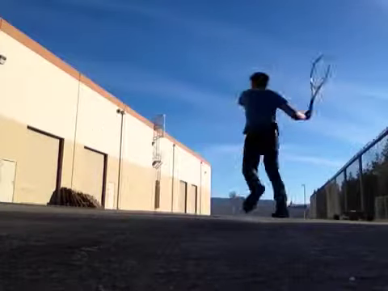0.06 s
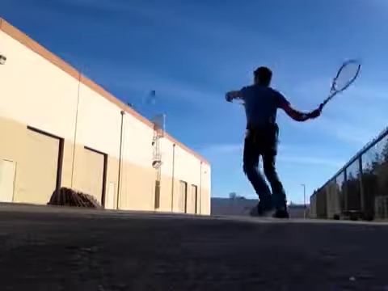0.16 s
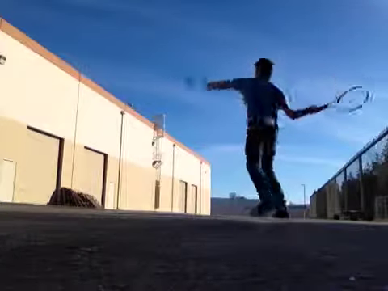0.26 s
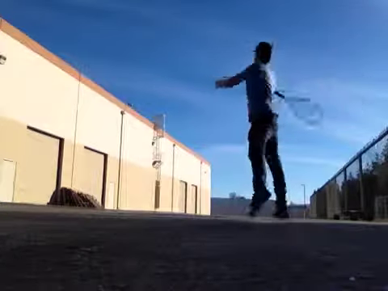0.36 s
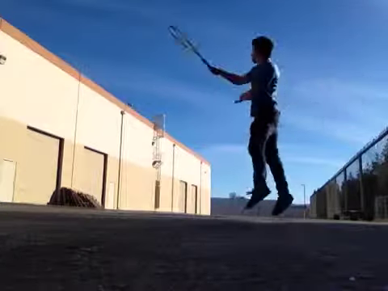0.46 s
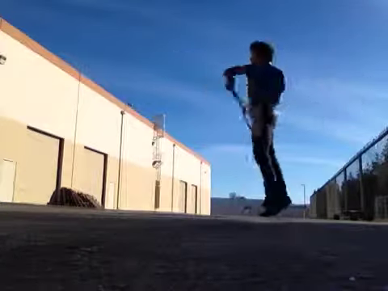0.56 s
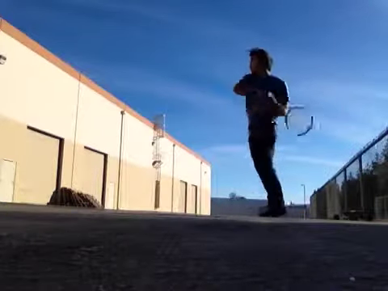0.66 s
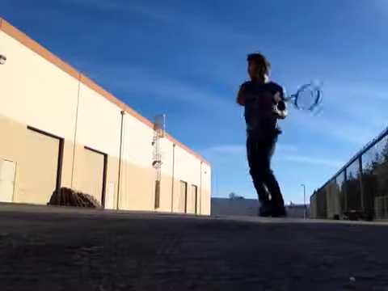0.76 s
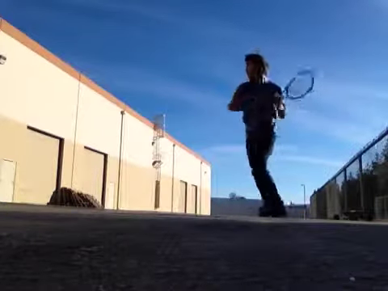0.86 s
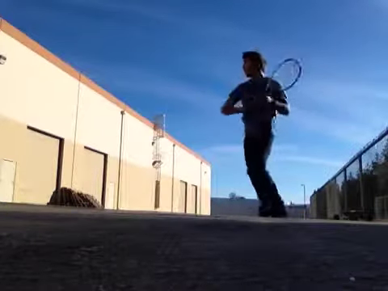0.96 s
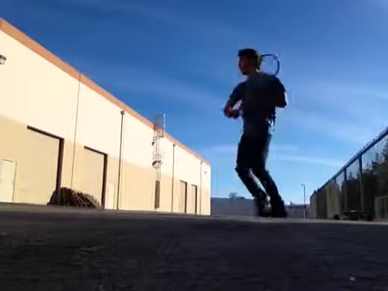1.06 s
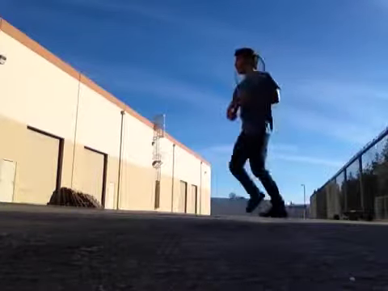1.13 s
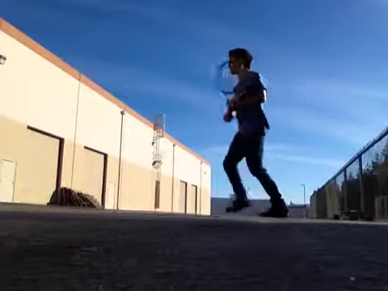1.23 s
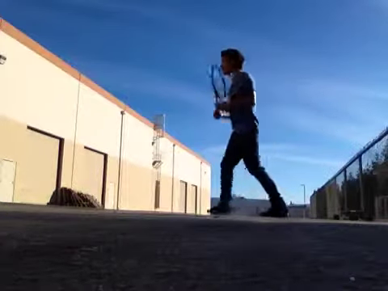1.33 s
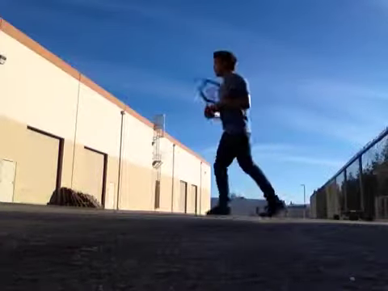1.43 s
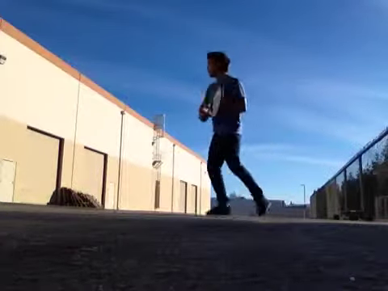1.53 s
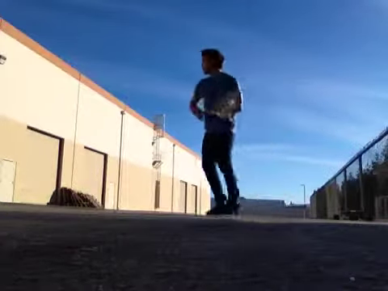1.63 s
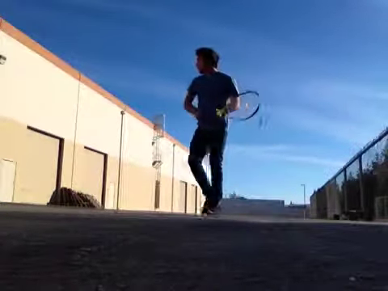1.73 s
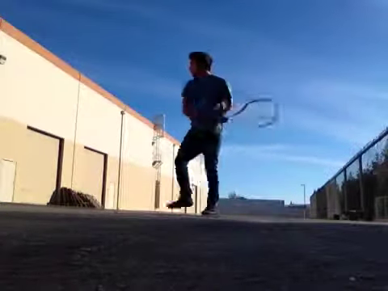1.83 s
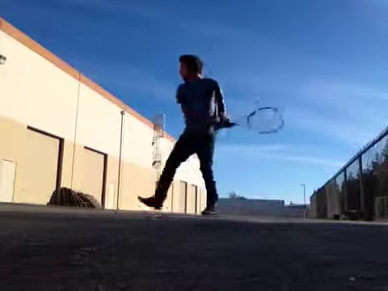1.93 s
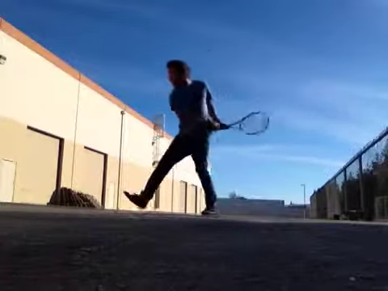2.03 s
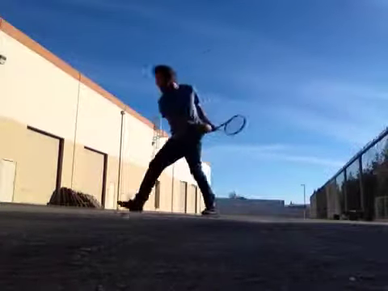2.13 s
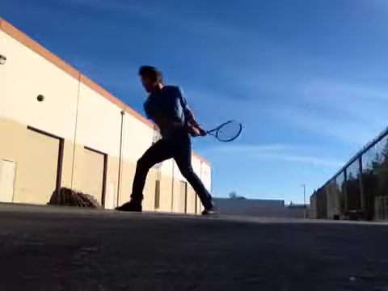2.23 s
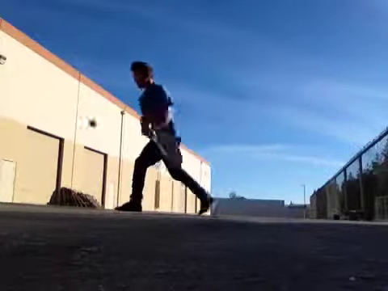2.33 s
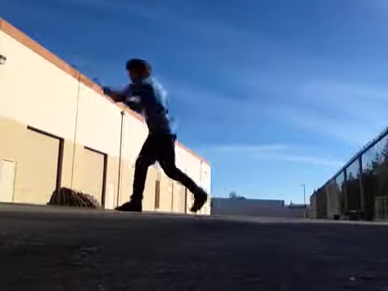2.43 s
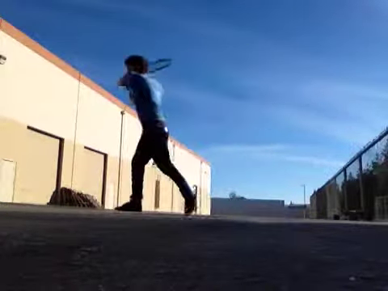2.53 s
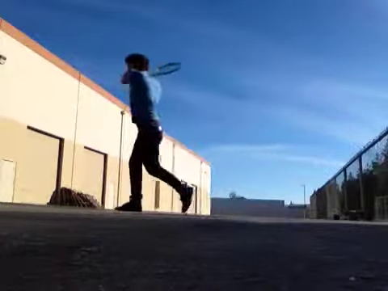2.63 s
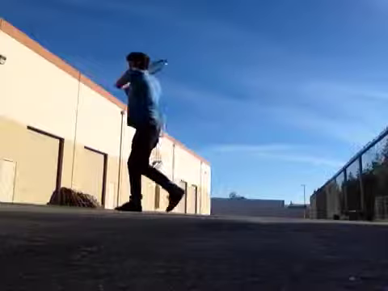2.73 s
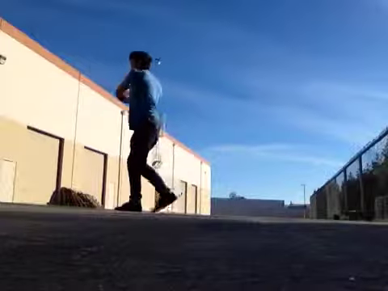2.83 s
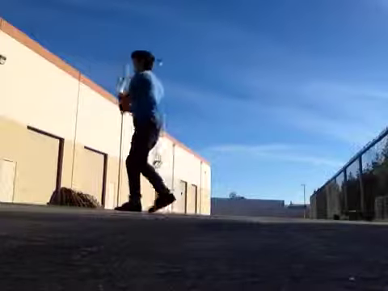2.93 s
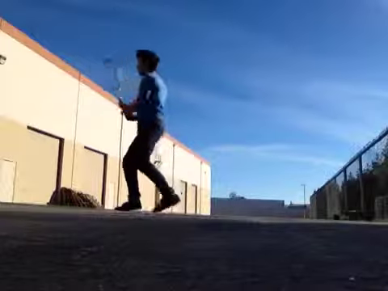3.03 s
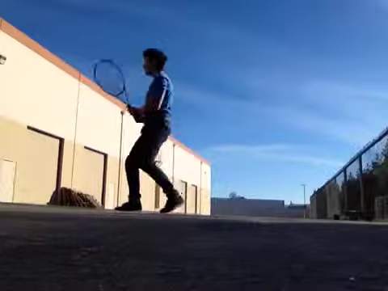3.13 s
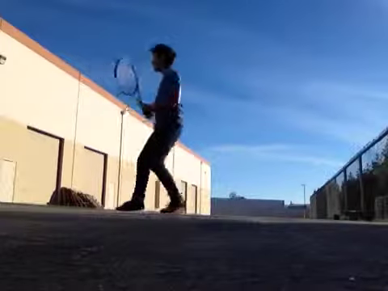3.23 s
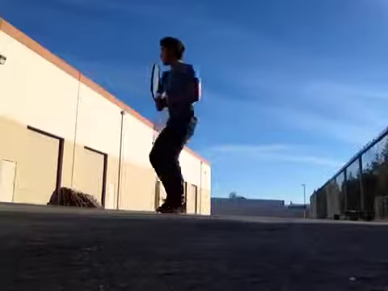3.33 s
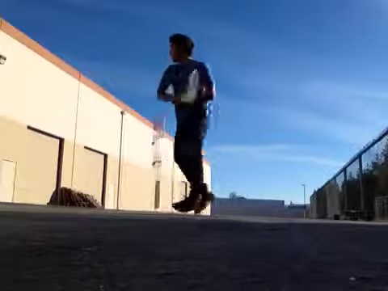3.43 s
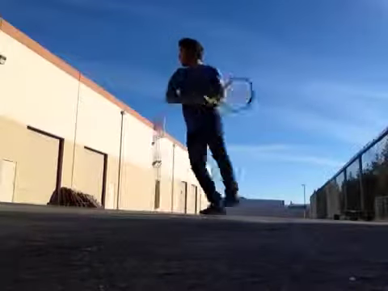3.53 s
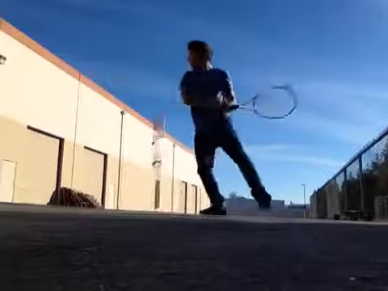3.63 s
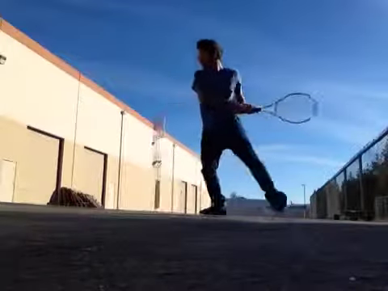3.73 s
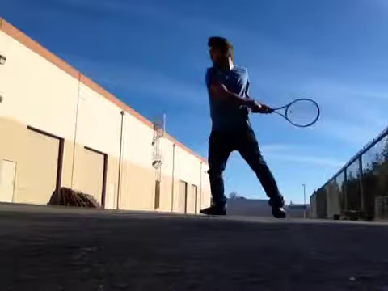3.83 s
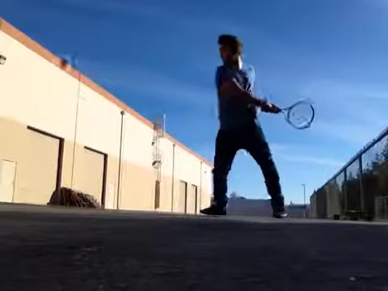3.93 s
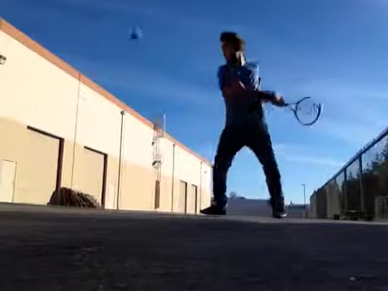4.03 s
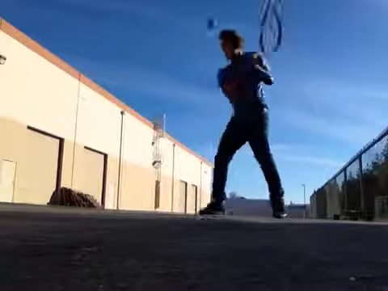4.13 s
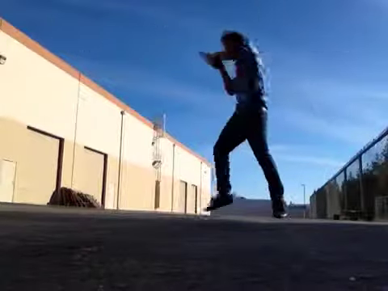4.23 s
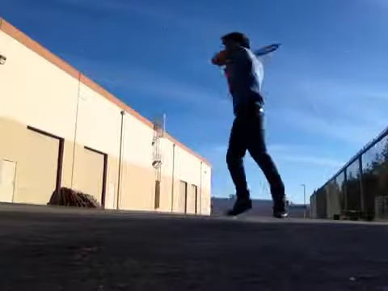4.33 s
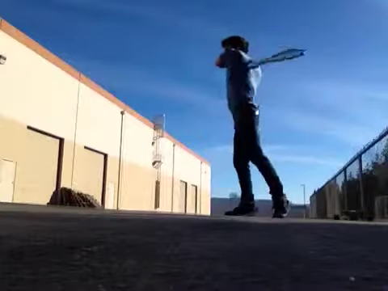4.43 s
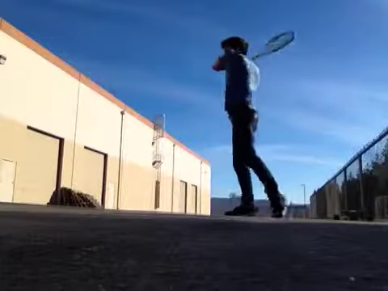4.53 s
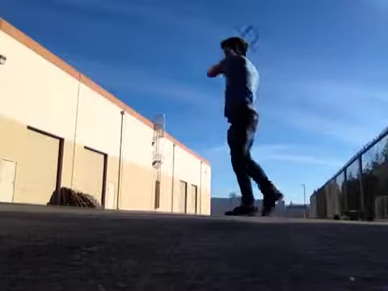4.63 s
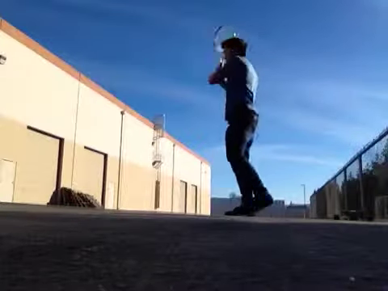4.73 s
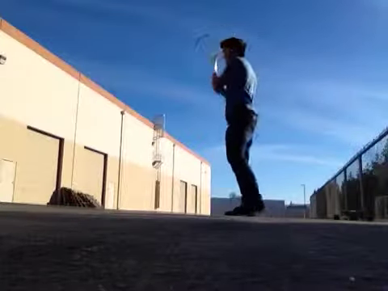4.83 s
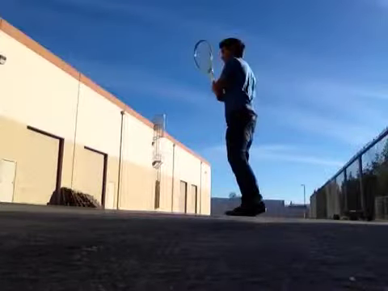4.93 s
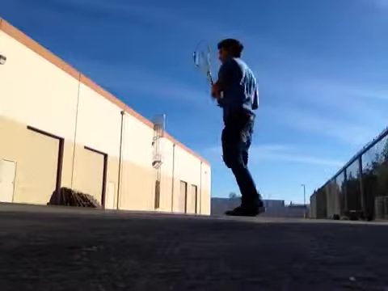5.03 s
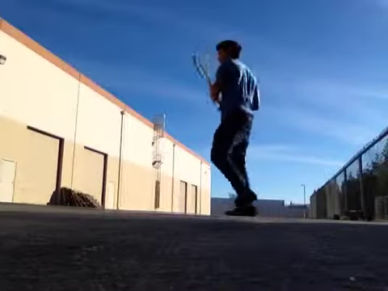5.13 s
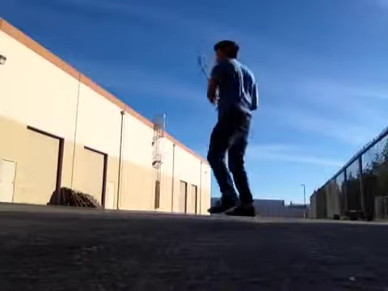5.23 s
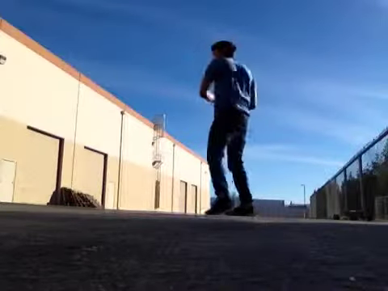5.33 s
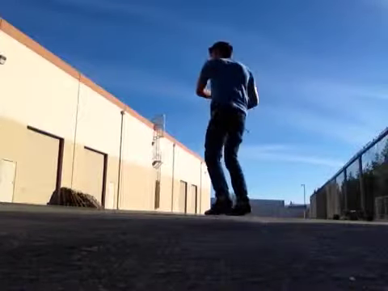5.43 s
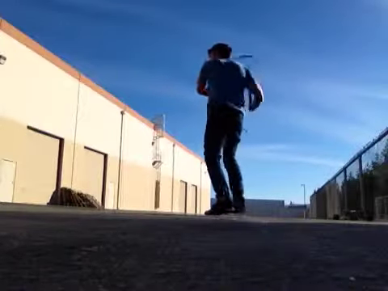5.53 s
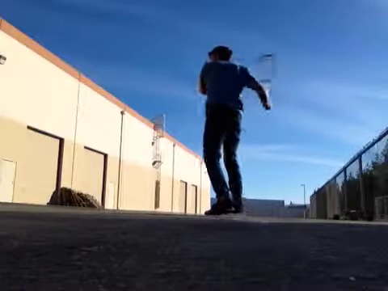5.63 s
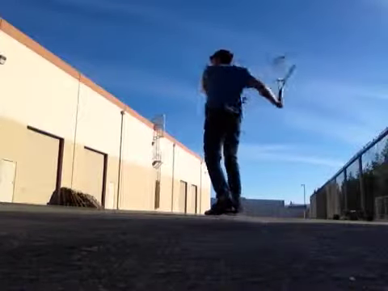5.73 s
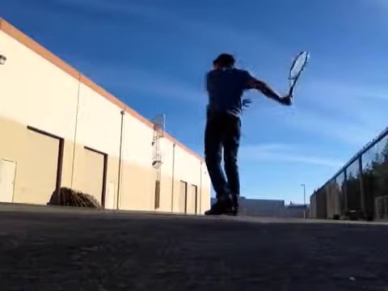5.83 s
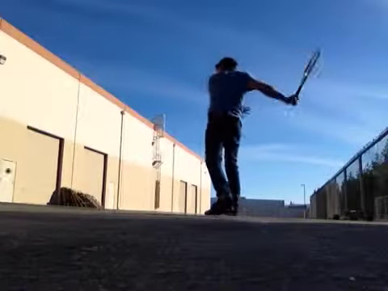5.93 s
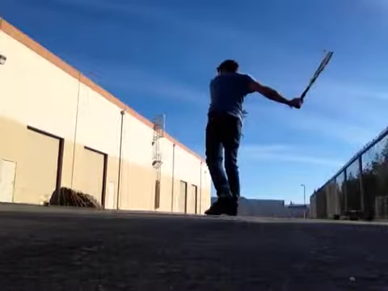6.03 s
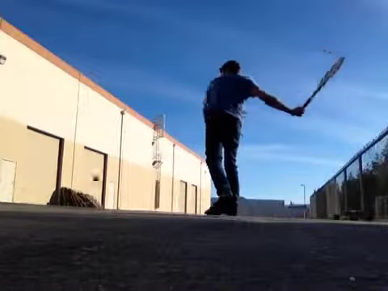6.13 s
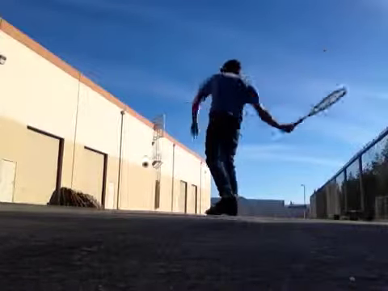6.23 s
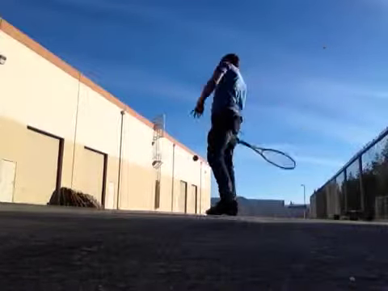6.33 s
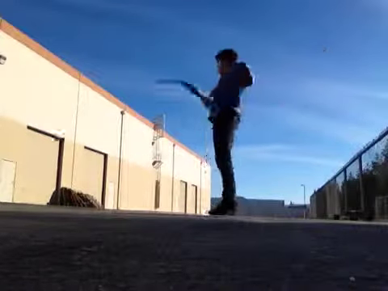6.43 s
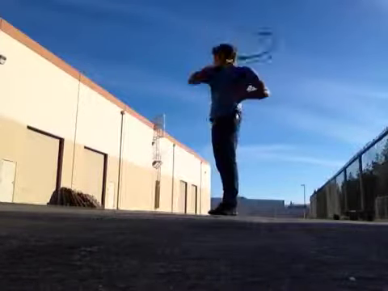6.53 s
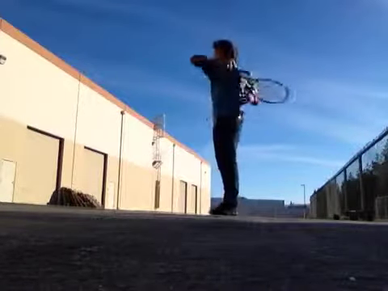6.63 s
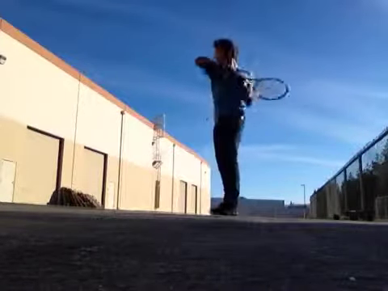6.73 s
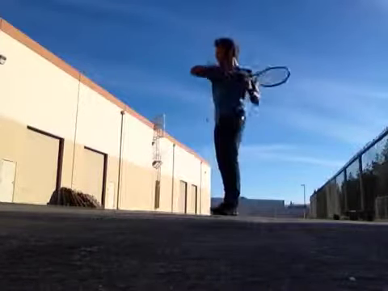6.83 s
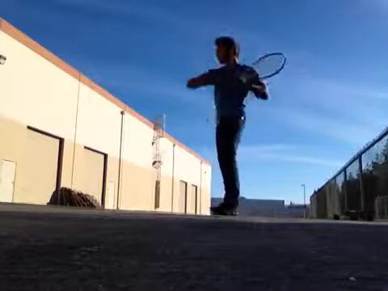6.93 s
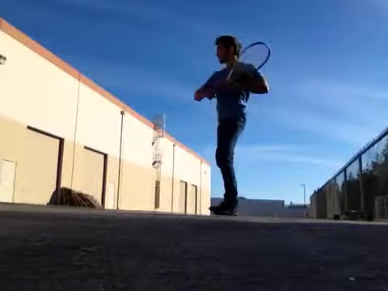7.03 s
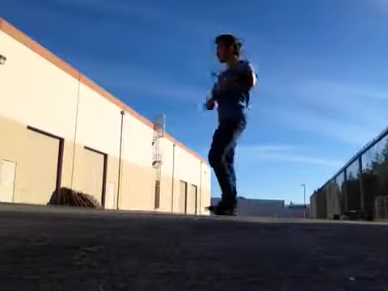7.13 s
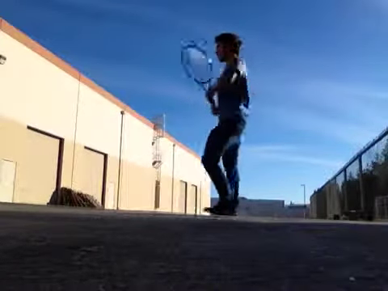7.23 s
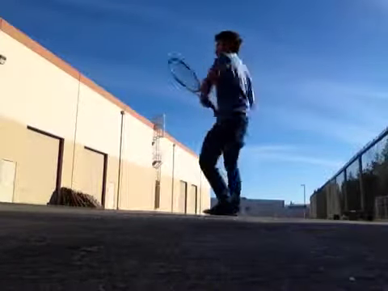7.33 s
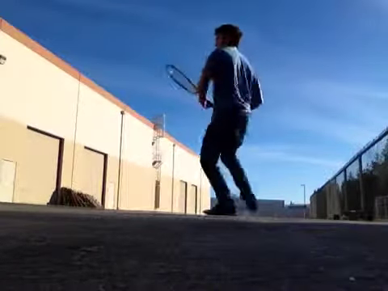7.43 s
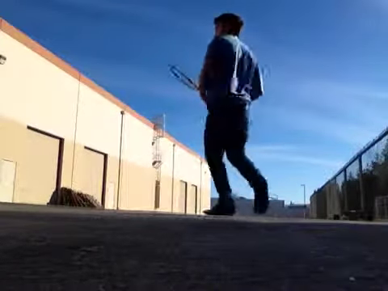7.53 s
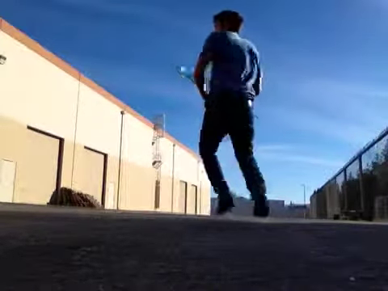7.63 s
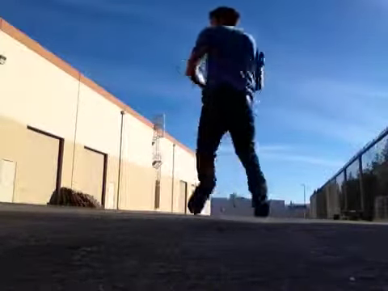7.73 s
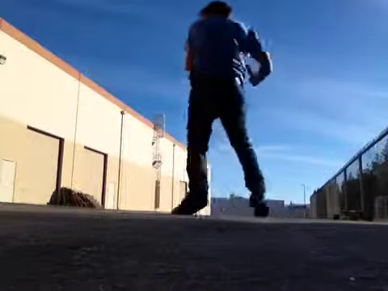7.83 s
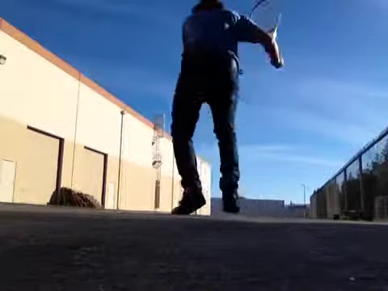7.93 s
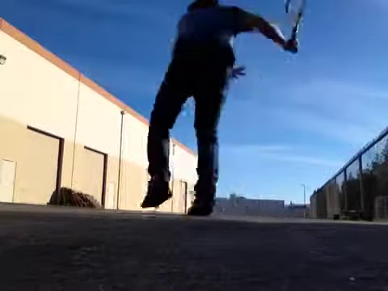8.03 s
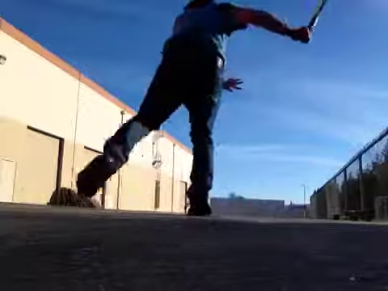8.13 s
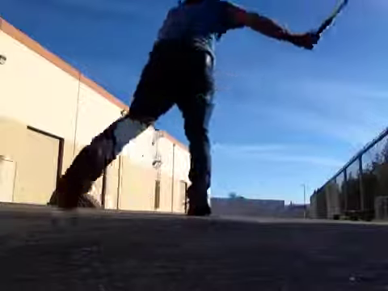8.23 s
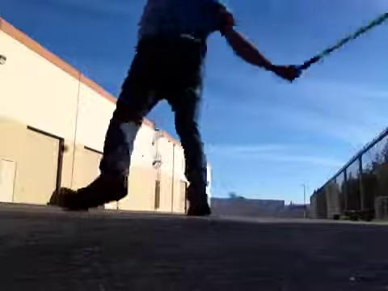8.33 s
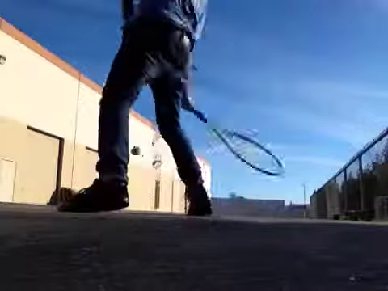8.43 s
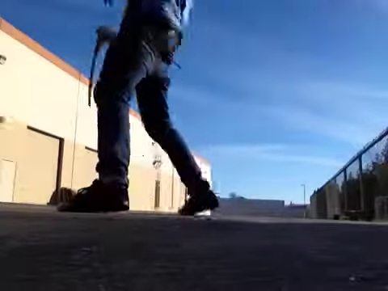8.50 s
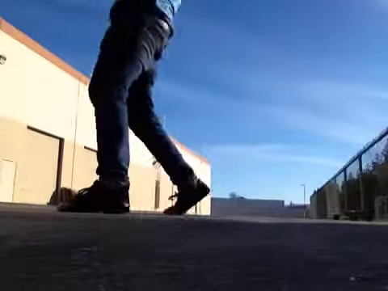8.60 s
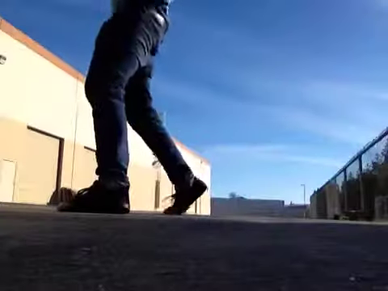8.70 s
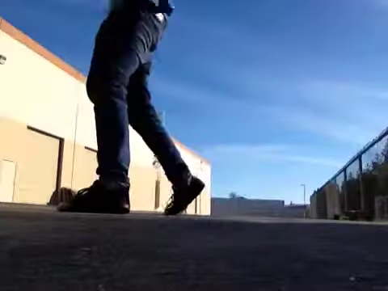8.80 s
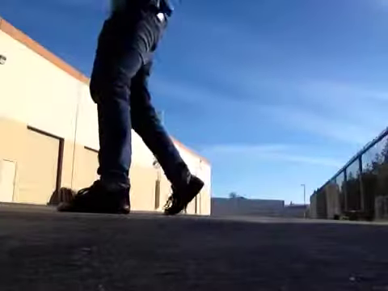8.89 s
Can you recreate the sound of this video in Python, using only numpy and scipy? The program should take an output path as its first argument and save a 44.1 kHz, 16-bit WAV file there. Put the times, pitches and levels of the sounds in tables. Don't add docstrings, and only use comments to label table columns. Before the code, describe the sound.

Outdoors in a paved yard beside a warehouse, heard from ground level, distant traffic makes a soft, swaying rumble and hiss with faint engine hums. A tennis racket strikes a ball at 0.5, 2.4, 4.2, 6.4 and 8.5 seconds: loud, short, hollow pops with a brief airy swish before them and a dull slap echo about 0.07 seconds after, fading into a short hiss. The ball knocks on the wall at 1.0, 2.9, 4.8 and 6.9, woody and lower, with a faint metallic door rattle. Much quieter bounces tick on asphalt at 1.6, 3.7, 5.3, 6.1, 7.4 and 8.1. Shoes scrape grit and squeak, busiest at 0.65-0.9 and around 1.8, with scattered light scuffs later. From 7.6 to 8.1 closer steps thud and crunch, with a sharp grit snap at 7.75. After the loud last pop, faint crunches and traffic remain.

```python
import sys
import numpy as np
from scipy import signal
from scipy.fft import rfft, irfft, next_fast_len
from scipy.io import wavfile
from scipy.ndimage import map_coordinates

SR = 44100
rng = np.random.default_rng(int(sys.argv[2]) if len(sys.argv) > 2 else 0)


def nominal_scale(level):
    x = np.asarray(level, float) / 20
    return 10 ** x


def int16_out(signal):
    q = np.round(np.clip(np.atleast_2d(signal).T, -1, 1) * 32767)
    wavfile.write(sys.argv[1], SR, q.astype(np.int16))


N = 395136
TIME = np.arange(N) / SR

BLOW_TIMES = [
    .4780,
    2.4141,
    4.2190,
    6.4335,
    8.5244,
]
# f/Hz, deepest/ms, rise/ms, fall/ms
SHELL_SQUASH = [
    (333, 3.25, 2.2, 0.42),
    (331, 2.25, 0.99, 0.95),
    (230, 2.8, 1.3, 2.4),
]
# t/s, wall slap level/dB, haze level/dB
ANSWER_ROWS = [(0.5429, -17, -45.5), (2.4811, -23.5, -59), (4.2898, -21.5, -54), (6.5, -20.5, -47.5),
               (8.595, -21, -50)]
# f/Hz, level/dB per Hz
TYRE_SPECTRUM = [(240, -5), (322, -15), (648, -15), (950, -15.5), (2060, -33.5), (2850, -41.5),
                 (4260, -47.5), (15500, -57.5)]


def unit(x):
    return x / np.sqrt(np.mean(x ** 2) + 1e-20)


def along(points, hz):
    f, v = np.transpose(points)
    return np.interp(np.log(hz + 1), np.log(f + 1), v)


def filtered(x, response):
    m = next_fast_len(len(x) + 8192)
    spectrum = rfft(x, m) * response(np.fft.rfftfreq(m, 1 / SR))
    return irfft(spectrum, m)[:len(x)]


def noise_through(count, response):
    return unit(filtered(rng.standard_normal(count), response))


def wobble(rate):
    knots = rng.standard_normal(int(N * rate / SR) + 4)
    return map_coordinates(knots, [TIME * rate])


def bell(t, rise, fall):
    width = np.where(t < 0, abs(rise), abs(fall))
    return np.exp(-.5 * (t / width) ** 2)


def add(track, s, x):
    part = track[round(s * SR):][:len(x)]
    part += x[:len(part)]


def ring(t, hz, t60, soft):
    t = np.maximum(t, 0)
    return np.sin(2 * np.pi * hz * t) * nominal_scale(-60 * t / t60) * (1 - np.exp(-t / soft))


def airy(hz):
    lift = 1 + .9 * (hz / 13000) ** 6
    low_cut = 1 + (2700 / (hz + 1)) ** 4
    return nominal_scale(along(TYRE_SPECTRUM, hz)) * np.sqrt(lift / low_cut)


def traffic():
    # t/s, level/dB
    loudness = [(0.0, -52), (0.22, -52), (0.62, -50), (1.44, -53), (1.82, -51.5), (2.47, -54.5),
                (2.62, -58), (4.16, -53.5), (4.59, -56), (5.04, -53.5), (5.71, -54.5), (6.64, -52.5),
                (7.39, -52.5), (8.48, -51), (8.76, -55), (8.96, -55.5)]
    # f/Hz, level/dB per Hz
    rumble_spectrum = [(15, -75), (53, -27), (69, -23), (129, -3), (160, -4.5), (240, -6), (322, -12.5),
                       (800, -18)]
    # start t/s, end t/s, first f/Hz, last f/Hz, level/dB
    engines = [
        (0, 0.847, 79, 80, -63.5),
        (3.75, 4.15, 124.3, 126.3, -65.5),
        (4.782, 5.38, 93, 96.8, -61.5),
        (5.602, 6.1, 89, 86, -62.5),
        (7.85, 8.7, 74.6, 76.7, -71),
    ]

    def rumble(hz):
        return nominal_scale(along(rumble_spectrum, hz)) / np.sqrt(1 + (hz / 400) ** 4)

    def tyres(hz):
        edges = (1 + (400 / (hz + 1)) ** 4) * (1 + (hz / 2700) ** 4)
        return nominal_scale(along(TYRE_SPECTRUM, hz)) / np.sqrt(edges)

    # dB over the loudness, share of its swings, own sway in dB, spectrum
    layers = [(-2, 0.92, 2, rumble), (-3, 0.69, 1, tyres), (-13, 0.9, 0.73, airy)]
    loud_db = np.interp(TIME, *np.transpose(loudness))
    mean_db = loud_db.mean()
    out = np.zeros(N)
    for over_db, share, sway_db, band in layers:
        noise = noise_through(N, band)
        out += nominal_scale(mean_db + over_db + share * (loud_db - mean_db) + sway_db * wobble(7)) * noise
    for start, end, from_hz, to_hz, db in engines:
        fade = np.clip(np.minimum(TIME - start + 0.093, end - TIME + 0.081) / 0.12, 0, 1)
        pitch_hz = np.interp(TIME, [start, end], [from_hz, to_hz])
        hum = np.sqrt(2) * np.sin(2 * np.pi * np.cumsum(pitch_hz) / SR)
        out += fade * nominal_scale(db + 2 * wobble(5)) * hum
    return out


def grit_snaps():
    # t/s, peak level/dB, f/Hz
    grains = [(0.053, -44, 4240), (0.1126, -42.5, 3260), (0.3277, -35.5, 12800), (0.406, -37, 3460),
              (0.495, -33, 10000), (0.6579, -44, 6800), (1.431, -41, 12300), (1.821, -38, 3860),
              (2.146, -44, 3180), (3.8542, -42, 3760), (4.0715, -40, 8970), (4.0867, -35, 4890),
              (4.431, -44, 3810), (5.3123, -48, 3380), (5.4331, -39.5, 4430), (7.638, -39, 3200),
              (7.7472, -20.5, 6000), (7.8912, -42.5, 3780), (8.0653, -41, 3720), (8.0976, -38, 11800),
              (8.149, -40, 7000), (7.757, -35, 5500), (7.764, -42, 4500), (8.6911, -42.5, 5400),
              (8.7085, -47, 3800), (8.8029, -45, 5000)]
    out, t = np.zeros(N), np.arange(SR // 40) / SR
    for s, db, hz in grains:
        chips = noise_through(len(t), lambda f: np.exp(-.5 * (np.log((f + 1) / hz) / 0.96) ** 2))
        snap = ring(t, hz, 6 / hz, .0001) + 0.17 * chips * nominal_scale(-60 * t / 0.016)
        add(out, s, nominal_scale(db - 0.5) * snap)
    return out


def heel_thuds():
    # t/s, peak level/dB, f/Hz
    heels = [(0.134, -30, 497), (7.602, -23, 570), (7.77, -23.5, 790), (7.831, -22.5, 450),
             (8.039, -22.5, 490), (8.277, -32.5, 409)]
    out, t = np.zeros(N), np.arange(SR // 40) / SR
    for s, db, hz in heels:
        add(out, s, nominal_scale(db + 8.5) * ring(t, hz, 2.6 / hz, 0.00071))
    return out


def swings():
    # top speed at t/s, speed-up/s, top whistle f/Hz, whistle level/dB, whoosh level/dB
    swing_rows = [(0.476, .055, 8630, -59.5, -52.5), (2.416, 0.059, 10360, -37.5, -42),
                  (4.202, 0.044, 8930, -46, -49), (6.431, 0.039, 9840, -60, -47),
                  (8.521, 0.042, 10800, -49, -39.5)]
    stroke_names = ["forehand", "backhand", "backhand", "forehand", "forehand"]
    follow_through = {"forehand": (0.14, -56), "backhand": (0.13, -63)}
    # share of top f, level/dB
    eddy_tones = [(0.93, 2.5), (.72, -3), (.5, -7.5)]
    # f/Hz, level/dB per Hz
    whoosh_spectrum = [(180, -33), (300, 1.5), (2280, -22.5), (5390, -12), (6360, -13), (7880, -8.5),
                       (9140, -9), (15500, -28)]
    air = np.zeros(N)
    t = np.arange(-SR // 5, SR // 4) / SR
    for (s, rise, top_hz, tone_db, rush_db), stroke, blow in zip(swing_rows, stroke_names, BLOW_TIMES):
        fall, after_db = follow_through[stroke]
        speed = bell(t, rise, fall)
        since = np.maximum(t + s - blow, 0)
        struck = since > 0

        loud = np.clip(speed - .3, 0, 1) ** 2.22 + 0.025 * speed ** .5
        dip_db = after_db - rush_db - 26 * np.exp(-since / 0.026) + 60 * np.minimum(since, .07)
        loud = loud * nominal_scale(8 + struck * dip_db)
        lumps = noise_through(len(t), lambda hz: hz < 250)
        loud = loud * bell(np.maximum(since - 0.062, 0), 1, 0.025) * nominal_scale(1.5 * lumps)

        speed = speed * np.where(struck, .88, 1)
        turn = 2 * np.pi * np.cumsum(top_hz * speed) / SR

        def blur():
            return filtered(rng.standard_normal(len(t)), lambda hz: np.exp(-(hz / 560) ** 2))

        tones = np.zeros(len(t))
        for share, db in eddy_tones:
            tones += nominal_scale(db) * unit(blur() * np.cos(share * turn) + blur() * np.sin(share * turn))
        rush = noise_through(len(t), lambda hz: nominal_scale(along(whoosh_spectrum, hz)))
        sizzle = noise_through(len(t), lambda hz: 1 / (1 + (10500 / (hz + 1)) ** 6))
        sizzle_db = -18 + 8.5 * (top_hz / 1000 - 9)
        rush = rush + nominal_scale(sizzle_db) * speed ** 2 * sizzle
        whistle = nominal_scale(tone_db - 2.0 * struck) * np.clip(speed / 0.51, 0, 1) ** 3 * tones
        add(air, s + t[0], loud * (whistle + nominal_scale(rush_db) * rush))
    return air


def contact(row, squash, modes, spike_db, spike_ms, lead_ms, land_db, split, brief, tail_db):
    db, cavity_hz, cavity_db, crack_db, kick_ms = row[:5]
    t = np.arange(SR // 4) / SR
    u = t * 1000 / spike_ms
    spike = -nominal_scale(spike_db) * (u * np.exp(1 - u)) ** 2

    edge_hz = 3000 * nominal_scale(1.8 * (crack_db + 22.5))
    felt = noise_through(len(t), lambda hz: hz / edge_hz / (1 + (hz / edge_hz) ** 2) ** 1.82)
    crack = nominal_scale(crack_db + 2.5) * felt * (nominal_scale(-60 * t / 0.016) + nominal_scale(-18.0 - 60 * t / 0.16))

    t = t - lead_ms / 1000
    shell_hz, deepest, rise, fall = squash
    shell = (t > 0) * np.sin(2 * np.pi * shell_hz * t) * bell(t * 1000 - deepest, rise, fall)
    for hz, level, t60 in modes:
        shell += nominal_scale(level + rng.normal(0, 1.5)) * ring(t, hz * rng.normal(1, .02), t60, .0003)
    landing = nominal_scale(land_db) * ring(t, cavity_hz * 1.026, 0.013, .0001)

    t = t - kick_ms / 1000
    pair = ring(t, cavity_hz * (1 - split), brief * 1.03, 0.00034)
    pair += 0.51 * ring(t, cavity_hz * (1 + split), brief, 0.00037)
    flutter = 1 + .5 * np.sin(2 * np.pi * 70 * t)
    after = nominal_scale(tail_db) * ring(t, cavity_hz * 1.17, .085, .004) * flutter
    return nominal_scale(db) * (spike + crack + shell + landing + nominal_scale(cavity_db) * (pair + after))


def racket():
    # squash level/dB, cavity f/Hz, cavity level/dB, crack level/dB, spring-back/ms
    blows = [(-7, 910, -2, -21.5, 2.2), (-5.5, 950, -1, -18.5, 2.03), (-6.5, 925, 0.5, -21, 2.22),
             (-8, 890, 2, -19.5, 2.7), (-4, 992, -3.5, -18.5, 2.17)]
    # f/Hz, level/dB, t60/s
    frame_modes = [(507.6, 2.5, 0.017), (1370, -50, 0.012), (1800, -10.5, 0.029), (2350, -21, 0.025)]
    # f/Hz, level/dB, t60/s
    string_pings = [(3270, -26, 0.045), (4150, -17, .012), (4190, -13, 0.022), (4800, -9.5, 0.014),
                    (2420, -18, 0.065)]
    near, back = np.zeros(N), np.zeros(N)
    for s, row, (back_s, back_db, _), ping in zip(BLOW_TIMES, blows, ANSWER_ROWS, string_pings):
        bed = [(hz, -26.5, 0.039) for hz in rng.uniform(1283, 3410, size=8)]
        pop = contact(row, SHELL_SQUASH[0], frame_modes + bed + [ping], spike_db=-10.5, spike_ms=0.22,
                      lead_ms=1.225, land_db=-7.5, split=0.054, brief=0.033, tail_db=-17)
        add(near, s, pop)
        steps = np.arange(len(pop))
        higher = np.interp(steps * 1.1, steps, pop)
        for lag, loss_db in [(0, 0.5), (.041, -15.5), (.075, -19)]:
            add(back, back_s + lag, nominal_scale(back_db - row[0] - 5.0 + loss_db) * higher)

    def wall_tone(hz):
        low_cut = 1j * hz / (250 + 1j * hz)
        return low_cut / (1 + (1j * hz / 1500) * 0.84 - (hz / 1500) ** 2)

    return near, filtered(back, wall_tone)


def haze():
    level = np.zeros(N)
    for s, _, db in ANSWER_ROWS:
        since = TIME - s
        level += nominal_scale(db - 60 * np.maximum(since, 0) / 0.42) * bell(np.minimum(since, 0), 0.049, 1)
    return level * noise_through(N, lambda hz: airy(hz) / (1 + (hz / 8000) ** 4))


def scuffs():
    # peak t/s, fall/s, level/dB, grit f/Hz
    planted = [(.66, 0.0075, -50, 3900), (.791, 0.011, -47, 4100), (0.796, 0.0089, -47, 2600),
               (2.784, 0.02, -57.5, 2350), (2.815, 0.025, -66, 4200), (4.096, 0.017, -57, 3600),
               (4.649, 0.016, -72, 4970), (5.438, 0.06, -69.5, 5400), (7.595, 0.032, -52.5, 3280),
               (7.625, 0.039, -58, 8000), (7.751, .006, -59, 2500), (8.04, 0.023, -51.5, 1800),
               (8.066, 0.0083, -49, 2100)]
    # peak t/s, width/s, level/dB, grit f/Hz
    sliding = [(0.844, .043, -64.5, 3730), (1.534, 0.018, -65.5, 5000), (1.771, 0.045, -67, 4260),
               (1.997, .043, -76, 4400), (3.511, 0.015, -65, 5930), (4.363, 0.019, -55.5, 4800),
               (6.361, .035, -66, 4200), (7.208, 0.083, -74.5, 4500), (7.64, 0.0072, -48, 1900),
               (7.768, .0095, -54.5, 5640), (7.9, 0.023, -68, 5000), (8.053, 0.012, -53, 6860),
               (8.249, 0.092, -71.5, 6000), (8.431, .012, -63.5, 8000)]
    out, t = np.zeros(N), np.arange(-SR // 5, SR // 4) / SR
    for rise_share, rows in [(0.39, planted), (1, sliding)]:
        for s, fall, db, grit_hz in rows:
            lumps = noise_through(len(t), lambda hz: hz < 350)
            grains = rng.standard_normal(len(t)) * nominal_scale(4.5 * lumps)

            def grit_tone(hz):
                hump = np.exp(-.5 * (np.log((hz + 1) / grit_hz) / 0.66) ** 2)
                return hump / (1 + (hz / 11000) ** 4)

            grit = unit(filtered(grains, grit_tone))
            add(out, s + t[0], nominal_scale(db) * bell(t, rise_share * fall, fall) * grit)
    return out


def squeaks():
    # t/s, width/s, level/dB, f/Hz
    drags = [(.79, 0.0031, -44, 4580), (.835, 0.022, -64, 4400), (.885, 0.034, -62.5, 3780),
             (1.767, 0.038, -65, 3680), (1.78, 0.044, -59, 1480), (2.02, .024, -75, 4600),
             (5.74, .05, -77.5, 2800), (7.183, .045, -69.5, 4330)]
    out, t = np.zeros(N), np.arange(-SR // 5, SR // 4) / SR
    for s, width, db, centre_hz in drags:
        chatter = noise_through(len(t), lambda hz: 1 / (1 + (2 * (hz - centre_hz) / 680) ** 2))
        add(out, s + t[0], nominal_scale(db) * bell(t, width, width) * chatter)
    return out


def wall_knocks():
    knock_times = [1.0171, 2.8767, 4.7878, 6.9417]
    knock_rows = [(-10, 970, -0.5, -21, 2.46), (-13.5, 850, -3.5, -21, 2.77), (-14.5, 920, 2.5, -20, 2.86),
                  (-10.5, 860, 2.5, -21, 2.78)]
    # f/Hz, level/dB, t60/s
    panel_modes = [(234, -1, 0.026), (2060, -20.5, 0.046), (3180, -20, 0.015)]
    door_levels = [-37, -39, -37, -48]
    out, t = np.zeros(N), np.arange(SR // 5) / SR
    for s, row, door_db in zip(knock_times, knock_rows, door_levels):
        knock = contact(row, SHELL_SQUASH[1], panel_modes, spike_db=7.5, spike_ms=0.21, lead_ms=0.17,
                        land_db=-4, split=0.049, brief=0.024, tail_db=-16.0)
        add(out, s, knock)
        rattle = unit(filtered(rng.normal(1, 8, len(t)), lambda hz: hz < 120))
        add(out, s, nominal_scale(row[0] + door_db) * ring(t, 4620, 0.12, 0.0044) * rattle)

        mesh = rng.standard_normal(400) * nominal_scale(-60 * t[:400] / .009)
        highs = filtered(knock, lambda hz: 1j * hz / (1500 + 1j * hz))
        add(out, s + 0.022, nominal_scale(-29) * np.convolve(highs, mesh))

        scatter = rng.standard_normal(1500) * bell(t[:1500] - .004, .002, .012)
        smeared = np.convolve(np.diff(knock), scatter)
        add(out, s + .066, nominal_scale(-38) * filtered(smeared, lambda hz: 1 / (1 + (hz / 4500) ** 2)))
    return out


def bounces():
    bounce_times = [1.6296, 3.7063, 5.2577, 6.0910, 7.4327, 8.1434]
    bounce_rows = [(-32, 1130, -4.5, -22.5, 0.11), (-26, 1060, -6, -21.5, 0.059),
                   (-36.5, 1170, -3.5, -21, 0.099), (-35.5, 1140, -2.5, -21, 0.1),
                   (-40.5, 1140, 6.5, -16.5, 0.022), (-41.5, 1090, 7.5, -21, 0.049)]
    out = np.zeros(N)
    for s, row in zip(bounce_times, bounce_rows):
        bounce = contact(row, SHELL_SQUASH[2], [], spike_db=6.0, spike_ms=0.18, lead_ms=0.36,
                         land_db=0, split=0.064, brief=0.029, tail_db=-14.0)
        add(out, s, bounce)
    return out


def yard(x):
    # f/Hz, t60/s
    decay_times = [(200, 0.71), (1000, 0.32), (4000, 0.6), (12000, 0.38)]
    out = np.zeros(N)
    for start in range(0, N, SR):
        hz, t, z = signal.stft(rng.standard_normal(SR // 2), SR, nperseg=256)
        fading = z * nominal_scale(-60 * t / along(decay_times, hz)[:, None])
        tail = signal.istft(fading, SR, nperseg=256)[1]
        delayed = np.pad(x[start:start + SR], (300, 0))
        add(out, start / SR, signal.fftconvolve(delayed, tail / np.linalg.norm(tail)))
    return out


def scene():
    hum = traffic()
    shoes = grit_snaps() + heel_thuds() + scuffs() + squeaks()
    air = swings()
    pops, back = racket()
    knocks = wall_knocks() + bounces()
    play = air + pops + back + knocks + shoes
    wet = nominal_scale(-29) * play + nominal_scale(-23.5) * knocks + nominal_scale(-16.0) * back

    def bass_cut(hz):
        return (1j * hz / (105 + 1j * hz)) ** 3 + nominal_scale(-33.5) / (1 + 1j * hz / 50)

    thin = filtered(play + yard(wet), bass_cut)
    return (thin + haze() + hum)[None]


def band_limit(x):
    return signal.sosfilt(signal.butter(12, 16430, fs=SR, output="sos"), x)


def record(dry):
    x = dry[0] / (1 + np.abs(dry[0] / .76) ** 6) ** (1 / 6)
    x = filtered(x, lambda hz: nominal_scale(-50 * np.clip((hz - 15250) / 300, 0, 1)))
    return band_limit(x[None])


dry = scene()
out = record(dry)
int16_out(out)
```